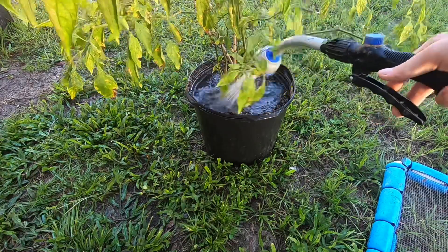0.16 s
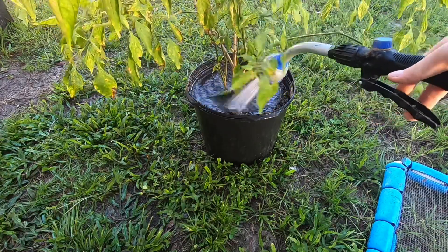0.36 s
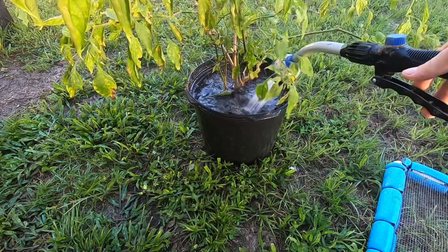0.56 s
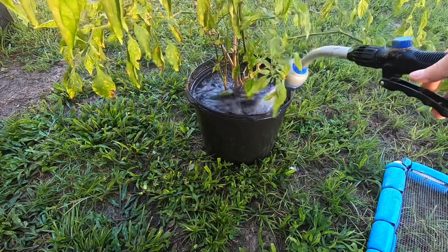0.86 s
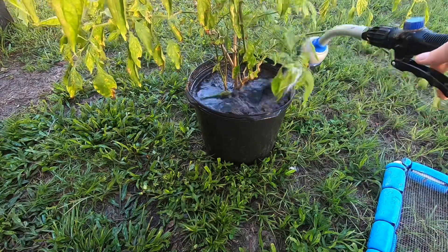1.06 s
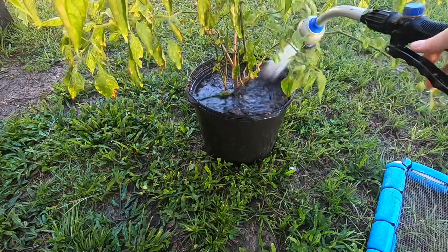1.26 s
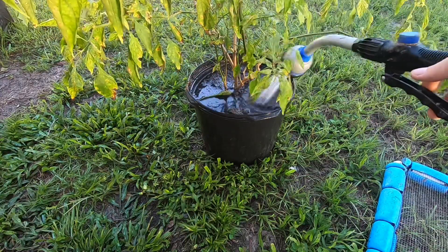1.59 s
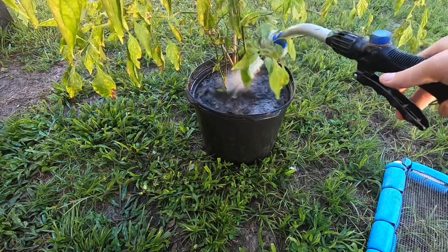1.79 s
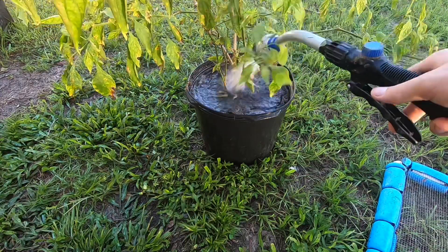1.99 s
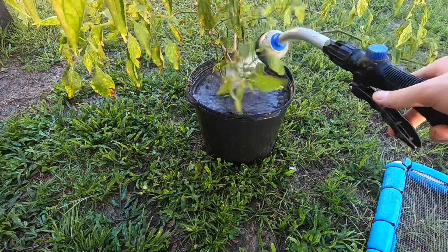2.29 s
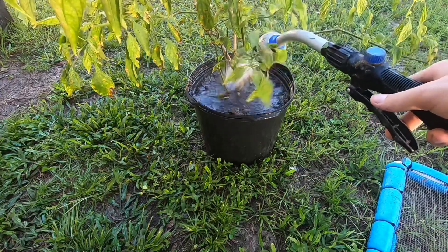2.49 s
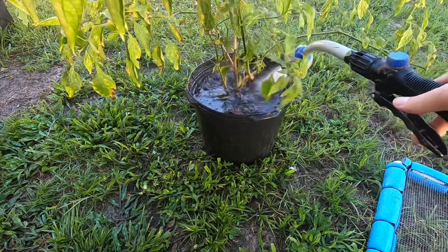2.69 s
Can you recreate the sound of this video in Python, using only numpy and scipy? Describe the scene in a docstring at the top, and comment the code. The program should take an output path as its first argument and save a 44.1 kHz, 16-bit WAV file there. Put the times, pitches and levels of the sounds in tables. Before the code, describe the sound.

A watering wand sprays close by, fizzing and bubbling into a full pot over a faint low hum

```python
"""A watering wand sprays into a flooded plant pot on a lawn, heard from close by.
From the start its jets hiss, spatter on leaves and beat small fizzing and large gurgling bubbles into the pool,
all made of damped sines on noise; the moving hand swells each part on its own, while an engine hums far off
over a rumble: a few sines over low noise. From 0.2 s sine bubbles ring out, from 0.9 s bursts of noise slap, just
after 1 s the gurgle swells; a narrow ring of noise, faint at first, swells after 1.8 s and later sinks in the spray."""
import sys
import numpy as np
from scipy import signal
from scipy.fft import rfft, irfft, next_fast_len
from scipy.io import wavfile
from scipy.ndimage import uniform_filter1d, map_coordinates

SR = 44100
rng = np.random.default_rng(int(sys.argv[2]) if len(sys.argv) > 2 else 0)


def wrap_up_sound(samples):
    """Save the sound to the file named by the first command line argument, as 16-bit audio."""
    columns = np.atleast_2d(samples).T
    # keep every value between -1 and 1, then stretch to whole-number steps
    tamed = np.clip(columns, -1, 1)
    steps = np.round(tamed * 32767).astype(np.int16)
    wavfile.write(sys.argv[1], SR, steps)


N = 125685

# Swells of the water as the hand moves the wand. Each row: time in seconds, then levels in dB of gurgle,
# pot resonance, low fizz, fizz, spatter, 5 kHz band and hiss, then left over right in dB for gurgle (and pot)
# and for hiss.
WATER_SWELLS = [(0.0, -55, -51, -52, -40, -44, -45, -34.5, -1, 1),
                (0.06, -58.5, -51, -46.5, -37, -49, -43.5, -38, 0, 1.5),
                (0.17, -55.5, -50, -47, -37.5, -45, -39, -37.5, 2, 2.5),
                (0.32, -57, -51, -48, -35.5, -44.5, -43, -36.5, -0.5, 1),
                (0.36, -66, -53, -49, -43.5, -54, -47, -41.5, 1, 1),
                (0.38, -54.5, -58, -51, -42, -49, -42, -40.5, 1, 2),
                (0.45, -58, -54.5, -57, -47.5, -47, -46.5, -40.5, 1, 1.5),
                (0.49, -59, -61, -56, -41.5, -47, -46, -41, -1, 1),
                (0.52, -57, -52.5, -50, -37.5, -43, -44, -39.5, 1, 2),
                (0.57, -60, -52, -43, -36.5, -40.5, -44.5, -39, 0, 1.5),
                (0.62, -60.5, -55, -47, -45, -50, -48, -37, 0, 1),
                (0.67, -54, -55, -47, -43, -44, -43.5, -40.5, 2.5, 3),
                (0.74, -56.5, -58, -55, -43, -49, -45, -38, 1.0, 1),
                (0.78, -55.5, -60.5, -52, -38.5, -44, -46, -40.5, 1, 3),
                (0.83, -55.5, -51.5, -49, -36.5, -44.5, -47, -39.5, 3, 0),
                (0.9, -57, -51.5, -46, -34.5, -41, -44, -37.5, 0, 2),
                (1.03, -56.5, -46.5, -49, -36.5, -40, -42, -36.5, -3, 1.5),
                (1.09, -46.5, -44, -50, -34.5, -40.5, -39.5, -37, 0, 1.5),
                (1.16, -45.5, -40, -38.5, -35.5, -40, -41, -37, -1, 1),
                (1.21, -44.5, -39.5, -38.5, -34, -38, -39.5, -36.5, -1, 0.5),
                (1.26, -47, -42, -47, -37.5, -38.5, -40, -35.5, -1, 0),
                (1.34, -49.5, -43.5, -48.5, -35, -39, -37, -34, -1.5, 0),
                (1.52, -57.5, -50, -53.5, -38, -42.5, -43.5, -36.5, -0.5, 1),
                (1.67, -53.5, -50.5, -51, -36.5, -45.5, -45.5, -40, 1.5, 0.5),
                (1.73, -45.5, -42, -42, -34, -42, -39.5, -33, 4, 1),
                (1.75, -46.5, -48, -48, -35, -40, -41.5, -34, 0, 0),
                (1.79, -51, -45, -44, -36, -43, -39, -33.5, 4, -1.0),
                (1.82, -51.5, -54.5, -52.5, -37, -46.5, -42.5, -38.5, 3.5, 1),
                (1.97, -53, -51, -52, -39.5, -42, -44.5, -38.5, 3.5, 0),
                (2.03, -56, -54, -43.5, -35, -37.5, -39, -36, 5.0, 0),
                (2.07, -50, -52.5, -55, -37, -41.5, -40, -38, 2, 1),
                (2.14, -45, -45.5, -50, -36, -40.5, -41.5, -35, 0.5, -1),
                (2.23, -52.5, -47.5, -52, -36.5, -44.5, -41.5, -38.5, 2, -0.5),
                (2.41, -46.5, -48, -51.5, -35, -41, -38.5, -36.5, 1.5, -1),
                (2.52, -47.5, -50, -46.5, -40.5, -39, -41, -37.5, 1.5, 0),
                (2.56, -53.5, -48, -51, -37.5, -45, -35.5, -38, 3, 0),
                (2.59, -49, -56, -53, -35, -42, -40, -38, 0, -0.5),
                (2.62, -51, -49.5, -49, -38, -42, -38.5, -37.5, -1, 0.5),
                (2.8, -56, -53, -49, -41, -44, -45.5, -39.5, -2, -1.5),
                (2.85, -54, -51, -48, -40, -44, -47, -39, 1, 2)]
# Colours of the water, from large bubbles to fine spray. Each row: frequency in Hz, relative level in dB per Hz.
GURGLE_COLOUR = [(220, -4), (380, -9.5), (566, 1.5), (699, 0.5), (950, 0.5), (1240, -4.5), (2090, -120)]
POT_COLOUR = [(750, -53), (930, -15), (1100, -3.5), (1320, -1), (1500, -6), (1700, -7), (1900, -36)]
LOW_FIZZ_COLOUR = [(1650, -38), (1800, -3), (1880, 3), (2140, 3), (2280, -2), (2500, -41)]
FIZZ_COLOUR = [(1950, -64), (2220, -3), (2500, 1), (2720, -0.5), (2950, 0.5), (3150, 0.5), (3350, -2),
               (3650, -4), (4100, -60)]
SPATTER_COLOUR = [(3250, -36), (3600, -3.5), (4000, -2), (4500, -5), (4900, -64)]
FIVE_KHZ_COLOUR = [(4100, -41), (4450, 1), (4880, -1.5), (5200, 0), (5600, -5), (6100, -49)]
HISS_COLOUR = [(4800, -69), (5400, -6.5), (5700, 0.5), (7320, -1), (8500, 0), (10000, -4.5), (10800, -10.5),
               (11600, -17.5), (13800, -15.5), (14600, -32), (15100, -50), (15400, -45)]
# Tint of the fizz. Each row: time in seconds, level below and level above FIZZ_EDGES_HZ in dB, later centred on 0.
FIZZ_TINT = [(0, -0.5, 1), (.15, -2, 0.5), (.24, -0.5, -1), (.33, 0.5, 0.5), (.45, -1.5, 1), (.53, -3, 0),
             (.59, 3, -4), (.7, -1, -1), (.8, -2, 0), (.9, -1, -1), (1.05, 1, 1), (1.2, 1, 0.5),
             (1.4, 0.5, 1.5), (1.55, -1, 2), (1.65, 2.5, -4), (1.76, 1.5, -3), (1.9, 0, 1.5),
             (2.05, -2.5, -1), (2.13, 0, 1), (2.3, 0, -1), (2.47, -1.5, 0), (2.6, 0, -1.5), (2.85, 0.5, 0)]
FIZZ_EDGES_HZ = 2700, 3420
# Tint of the hiss. Each row: time in seconds, level below, between and above HISS_EDGES_HZ in dB,
# each later centred on 0.
HISS_TINT = [(0, -3, -16.5, -4.0), (0.1, -5.5, -8, -3.5), (0.2, -3.5, -9, -2.5), (0.32, -3, -9, -2.5),
             (0.4, -7.0, -1, -2), (0.5, -4.5, -1.5, -2.5), (0.6, -7.5, -3.5, -3.5), (0.72, -5.5, 1, -3.5),
             (0.82, -3, -7, -3.5), (0.92, -2.5, -13.5, -4.5), (1.05, -2.5, -4, -5), (1.2, -2.5, -0.5, -5),
             (1.35, -5.5, 1.5, -6.5), (1.5, -4, -1.5, -5.5), (1.62, -5.5, -2.5, -3.5),
             (1.73, -4.5, -15, -3.5), (1.85, -3.5, 1.5, -7), (2, -1.5, -6.0, -5), (2.15, -3.0, -8.5, -8),
             (2.3, -0.5, -7, -4), (2.45, -3.5, -12, -6.5), (2.6, -2.5, -2, -3.5), (2.72, -6.5, 1.5, -4.5),
             (2.85, -1.5, -11, -2)]
HISS_EDGES_HZ = 7050, 7440
# Inverted echo off the pool as the wand rises and dips. Each row: time in seconds, comb spacing left and right
# in Hz, strength left and right from 0 to 1.
POOL_ECHO = [(0, 2210, 2460, 0.46, 0.16), (.33, 2280, 2420, 0.7, 0.22), (.43, 2120, 2200, 0.44, 0.03),
             (.75, 1980, 2040, 0.07, 0.34), (.95, 2260, 2370, 0.15, 0.33), (1.15, 2680, 2570, 0.03, 0.18),
             (1.45, 2410, 2450, 0.12, 0.36), (1.6, 2260, 2190, 0.03, 0.1), (1.7, 1980, 1880, 0.23, 0.37),
             (1.95, 1860, 2100, 0.1, 0.12), (2.3, 1830, 1940, 0.04, 0.2), (2.6, 2030, 2020, 0.14, 0.17),
             (2.85, 2100, 2030, 0, 0)]
# Slaps of water on the pool. Each row: start in seconds, level in dB before SLAP_UNDER_DB and the rise.
SLAPS = [(.856, -17.5), (.87, -17), (1.002, -31), (1.077, -24), (1.1544, -18), (1.168, -20), (1.184, -24),
         (1.197, -20), (1.221, -25), (1.281, -18), (1.54, -33), (1.71, -25), (1.7294, -27), (1.757, -17),
         (2.2166, -18), (2.345, -15), (2.384, -21), (2.465, -28), (2.5491, -21), (2.5694, -19)]
SLAP_T60_S, SLAP_RISE_S, SLAP_UNDER_DB = 0.026, 0.00072, 8.5
# Colour of a slap. Each row: frequency in Hz, relative level in dB per Hz.
SLAP_COLOUR = [(700, -38), (1500, -18), (3000, 3), (6000, -3), (10000, -11), (14000, -40)]
# Single bubbles, large and small. Each row: start in seconds, pitch in Hz, level in dB before the rise,
# 60 dB decay in seconds.
BUBBLES = [(.176, 3190, -19, 0.044), (.232, 2400, -16.5, 0.038), (.532, 3020, -20, 0.041),
           (.855, 5060, -21, .03), (1.0, 3320, -14, 0.035), (1.074, 2850, -14, .03),
           (1.195, 2760, -16, .04), (1.35, 6130, -23, .025), (1.748, 4570, -23, .03),
           (2.12, 2460, -18, 0.044), (2.143, 3110, -18, 0.037), (2.358, 4820, -18, .03),
           (2.462, 5900, -21, 0.033), (2.548, 3880, -21, .03), (2.588, 2880, -20, 0.044),
           (2.623, 4860, -20, 0.034), (.598, 2190, -21, 0.041), (1.169, 2740, -17, 0.052),
           (1.181, 1900, -21.5, 0.095), (1.194, 1815, -21, 0.043), (1.206, 1904, -24, 0.095),
           (1.219, 1310, -9, 0.013), (1.725, 2120, -21, 0.053), (1.755, 2585, -11.5, 0.037),
           (2.38, 4930, -14, 0.041), (2.462, 3130, -12.5, 0.039), (2.55, 4700, -14.5, 0.03),
           (2.567, 2875, -18.5, 0.052)]
BUBBLE_RISE_S = 0.0095
# Narrow ring in the spray. Each row: time in seconds, centre in Hz, level in dB.
RING = [(1.8, 4900, -53), (1.95, 4900, -44), (2.1, 4900, -51), (2.23, 4880, -41), (2.28, 4870, -52),
        (2.37, 4880, -45), (2.5, 4850, -47), (2.55, 4850, -43), (2.63, 4800, -45), (2.72, 4650, -48),
        (2.85, 4550, -40.5)]
RING_WIDTH_HZ = 130
# Swells of the distance. Each row: time in seconds, then levels in dB of engine hum, deep rumble and
# low noise near 140 Hz.
FAR_SWELLS = [(0.0, -46, -48, -46), (0.13, -61, -56, -56.5), (0.29, -48.5, -44, -53), (0.38, -63, -54, -49),
              (0.48, -48.5, -52, -49.5), (0.58, -66, -66, -58), (0.63, -54, -57, -47.5),
              (0.76, -56, -64, -52), (1.09, -46.5, -55.5, -53.5), (1.21, -63, -59, -51),
              (1.27, -50, -53, -52.5), (1.52, -54.5, -62, -56), (1.69, -48.5, -57, -49.5),
              (1.81, -59, -71, -61), (1.93, -60, -50, -55), (1.99, -44, -69, -54.5), (2.04, -71, -66, -58),
              (2.08, -47, -60, -58), (2.18, -56, -53, -52), (2.23, -55, -53, -58), (2.36, -50, -48, -49),
              (2.44, -57, -58, -54), (2.56, -44.5, -51, -53.5), (2.76, -61, -63, -60),
              (2.81, -45, -44, -60), (2.85, -47, -44, -52)]
# Harmonics of the engine. Each row: order (multiple of ENGINE_HZ), mean level in dB against the hum's swell.
ENGINE_HARMONICS = [(2, -0.5), (4, -14), (5, -19.5)]
ENGINE_HZ, ENGINE_DRIFT = 51.4, 0.0301  # drift as a fraction of the speed
# Colours of the far noises. Each row: frequency in Hz, relative level in dB per Hz.
DEEP_COLOUR = [(15, -38), (30, -31), (55, -13), (70, -20), (100, -56)]
LOW_NOISE_COLOUR = [(105, -51), (122, 5.5), (145, -1), (170, -2.5), (200, -52.5)]
RUMBLE_COLOUR = [(38, -40), (65, 6.5), (123, -6), (180, -5), (314, -13), (400, -15), (520, -11),
                 (880, -120)]
RUMBLE_DB = -52
# Stereo width of the noise layers. Each row: frequency in Hz, side over mid in dB.
SIDE_DB = [(60, -19), (150, -14.5), (300, -9.5), (500, -12.5), (800, -6), (1200, -14), (1700, -7),
           (2300, -35), (3300, -25), (5000, -13.5), (7000, -2.5), (9000, -6.5), (11500, 3), (14900, -9)]
# Colour difference of the two ports. Each row: frequency in Hz, left over right in dB.
PORT_BALANCE_DB = [(60, -0.5), (99, -1.5), (160, 0), (270, -2), (450, 1.5), (740, -5), (1210, 1.5),
                   (2010, 0.5), (3310, -1), (5470, -1), (9030, -1.5), (14900, 0.5)]
# Phase difference of the two ports. Each row: frequency in Hz, lead of left over right in radians.
PORT_LEAD = [(600, 0.1), (950, 1), (1290, 0.33), (1640, 0.87), (2000, 0.82), (2600, -0.13), (5600, -0.78),
             (6300, 0.95), (7300, 0.44), (8300, -2.15), (10400, -0.64)]
TOP_HZ = 15500


def water():
    """Pool and spray ride the same surges of the jets; the pool throws the spray back as an echo."""
    surge_db = 0.5 * wobble(8.37) + 0.24 * wobble(25.89)
    return amp(surge_db) * (pool() + echoed(spray()))


def pool():
    """Jets beat air under water: large bubbles gurgle, the pot resonates and smaller bubbles fizz low."""
    gurgle_db, pot_db, low_fizz_db, *_, gurgle_pan_db, _ = curves(WATER_SWELLS)
    pan_db = np.array([[.5], [-.5]]) * gurgle_pan_db
    gurgle = layer(GURGLE_COLOUR, count=500, size=800, cycles=1.24, share=0.028)
    pot = layer(POT_COLOUR, count=700, size=700, cycles=5.6, share=0.018)
    low_fizz = layer(LOW_FIZZ_COLOUR, count=500, size=700, cycles=5.9, share=0.019)
    return amp(gurgle_db + pan_db) * gurgle + amp(pot_db + pan_db) * pot + amp(low_fizz_db) * low_fizz


def spray():
    """The finer the bubbles and drops, the higher they sound: fizz, spatter, a 5 kHz band and hiss."""
    _, _, _, fizz_db, spatter_db, five_khz_db, hiss_db, _, hiss_pan_db = curves(WATER_SWELLS)
    pan_db = np.array([[.5], [-.5]]) * hiss_pan_db
    below_db, above_db = curves(FIZZ_TINT)
    fizz = layer(FIZZ_COLOUR, count=4000, size=600, cycles=6.7, share=0.1)
    fizz = tinted(fizz, (below_db, 0, above_db), FIZZ_EDGES_HZ)
    spatter = layer(SPATTER_COLOUR, count=1500, size=600, cycles=11, share=0.074)
    five_khz = layer(FIVE_KHZ_COLOUR, count=1500, size=600, cycles=17.7, share=0.054, depth_db=1.3)
    hiss = layer(HISS_COLOUR, count=6000, size=100, cycles=1.8, share=0.19, depth_db=2)
    hiss = tinted(hiss, curves(HISS_TINT), HISS_EDGES_HZ)
    return (amp(fizz_db) * fizz + amp(spatter_db) * spatter
            + amp(five_khz_db) * five_khz + amp(hiss_db + pan_db) * hiss)


def layer(colour, count, size, cycles, share, depth_db=0):
    """Bubbles or drops mixed into noise, the swarm taking its share of the power."""
    swarm = grains(colour, count, size, cycles, spread_db=5.5, chirp=0.02)
    return spread(share ** .5 * swarm + (1 - share) ** .5 * patchy(depth_db), colour)


def grains(colour, count, size, cycles, spread_db, chirp):
    """Two swarms of damped, rising sines across the colour's span, of even energy per Hz."""
    lo, hi = colour[1][0], colour[-2][0]
    chance = rng.random((2 * count, 3))  # start, pitch, level
    t = np.arange(size) / SR
    hz = (lo * (hi / lo) ** chance[:, 1])[:, None]
    age = t * hz / cycles  # in decay times, each lasting this many cycles
    envelope = np.exp(-age) * (1 - np.exp(-6 * age))
    tone = np.sin(2 * np.pi * hz * t * (1 + chirp * age / 2))
    wave = hz * amp(spread_db * chance[:, 2:]) * envelope * tone
    # every other grain goes to the second swarm, laid end to end with the first
    start = (chance[:, 0] * N).astype(int) + (np.arange(2 * count) % 2) * (N + size)
    places = start[:, None] + np.arange(size)
    out = np.bincount(places.ravel(), wave.ravel(), 2 * (N + size))
    return unit(out.reshape(2, -1)[:, :N])


def patchy(depth_db):
    """Two white noises sharing patches of random gain in time and frequency; depth 0 leaves them even."""
    z = signal.stft(rng.standard_normal((2, N)), nperseg=256)[2]
    field = uniform_filter1d(rng.standard_normal(z.shape[1:]), size=4, axis=0)
    field = uniform_filter1d(field, size=9, axis=1)
    return unit(signal.istft(z * amp(depth_db * unit(field)), nperseg=256)[1][:, :N])


def tinted(x, levels_db, edges_hz):
    """Low, middle and high part of x, each moving about its mean level."""
    lo, hi = (filtered(x, lambda hz: 1 / (1 + (hz / edge) ** 30)) for edge in edges_hz)
    parts = lo, hi - lo, x - hi
    return sum(amp(db - np.mean(db)) * part for db, part in zip(levels_db, parts))


def echoed(x):
    """A reflection off the pool: each side with its delayed, inverted copy combs the sound."""
    left_hz, right_hz, *strength = curves(POOL_ECHO)
    strength = np.array(strength)
    # comb notches lie one spacing apart, so the delay is its inverse
    late = [map_coordinates(v, [np.arange(N) - SR / hz]) for v, hz in zip(x, (left_hz, right_hz))]
    return (x - strength * late) / (1 + strength ** 2) ** .5


def bubbles():
    """Single bubbles ring out clearly, each a sine that swells in and dies away."""
    out, t = np.zeros(N + SR), np.arange(SR // 4) / SR
    for s, hz, db, t60 in BUBBLES:
        envelope = amp(db - 60 * t / t60) * (1 - np.exp(-t / BUBBLE_RISE_S))
        out[round(s * SR):][:len(t)] += envelope * np.sin(2 * np.pi * hz * t)
    return out[:N]


def slaps():
    """Short bursts of broad noise where a gush lands."""
    shape, t = np.zeros(N + SR), np.arange(SR // 10) / SR
    for s, db in SLAPS:
        decay = amp(db - SLAP_UNDER_DB - 60 * t / SLAP_T60_S)
        shape[round(s * SR):][:len(t)] += decay * (1 - np.exp(-t / SLAP_RISE_S))
    return shape[:N] * spread(patchy(0), SLAP_COLOUR)


def ring():
    """Narrow noise around a sinking centre: slow noise carried on a sine and a cosine."""
    hz, db = curves(RING)
    slow = filtered(rng.standard_normal((2, N)), lambda f: 1 / (1 + (2 * f / RING_WIDTH_HZ) ** 2))
    turn = 2 * np.pi * np.cumsum(hz) / SR
    return amp(db) * unit(slow[0] * np.sin(turn) + slow[1] * np.cos(turn))


def distance():
    """An unsteady engine, harmonics on a drifting speed, hums over bands of low noise."""
    hum_db, deep_db, low_noise_db = curves(FAR_SWELLS)
    turn = 2 * np.pi * np.cumsum(ENGINE_HZ * (1 + ENGINE_DRIFT * wobble(7))) / SR
    hum = sum(2 ** .5 * amp(db + 1.5 * wobble(4)) * np.sin(k * turn) for k, db in ENGINE_HARMONICS)
    deep = spread(patchy(0), DEEP_COLOUR)
    low_noise = spread(patchy(0), LOW_NOISE_COLOUR)
    rumble = spread(patchy(0), RUMBLE_COLOUR)
    return amp(hum_db) * hum + amp(deep_db) * deep + amp(low_noise_db) * low_noise + amp(RUMBLE_DB) * rumble


def spread(pair, colour):
    """Colour a pair, one as mid and one as side; left and right, with mid at rms 1."""
    mid, side = filtered(pair, lambda hz: amp(along(colour, hz) + [0 * hz, along(SIDE_DB, hz)]))
    return np.array([mid + side, mid - side]) / np.std(mid)


def filtered(x, response):
    """x shaped by a response of frequency."""
    m = next_fast_len(N + 8192)
    return irfft(rfft(x, m) * response(np.fft.rfftfreq(m, 1 / SR)), m)[..., :N]


def along(points, hz):
    """Value at each frequency, read from (Hz, value) points on a log axis."""
    f, v = np.transpose(points)
    return np.interp(np.log(hz + 1), np.log(f + 1), v)


def curves(rows):
    """One value per sample for each column after the time."""
    s, *cols = np.transpose(rows)
    return [np.interp(np.arange(N) / SR, s, c) for c in cols]


def wobble(rate):
    """A smooth random curve, rate knots a second."""
    return map_coordinates(rng.standard_normal(200), [np.arange(N) * rate / SR])


def amp(db):
    """Decibels to amplitude."""
    return 10 ** (np.asarray(db) / 20)


def unit(x):
    """x at rms 1."""
    return x / np.sqrt(np.mean(x ** 2) + 1e-20)


def scene():
    """The water in front, the engine and rumble behind."""
    return water() + bubbles() + slaps() + ring() + distance()


def record(dry):
    """Two ports differ in colour and, from the lower middle up through the treble, in phase; the top is cut."""
    half = np.array([[.5], [-.5]])  # each port takes half the difference
    lead = [(450, 0)] + list(PORT_LEAD) + [(13000, 0)]

    def ports(hz):
        colour = amp(half * along(PORT_BALANCE_DB, hz))
        return (hz < TOP_HZ) * colour * np.exp(1j * half * along(lead, hz))

    return filtered(dry, ports)


dry = scene()
out = record(dry)
wrap_up_sound(out)
```